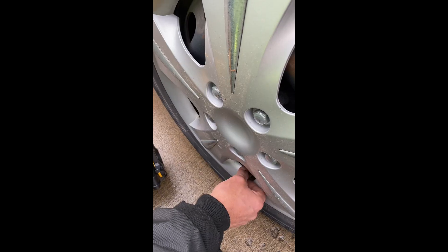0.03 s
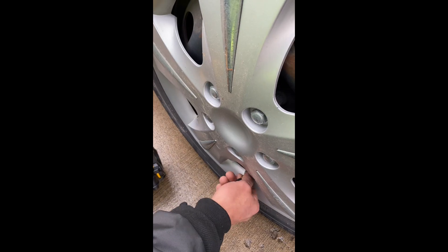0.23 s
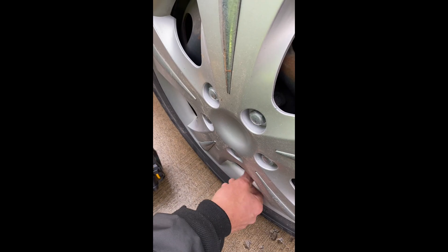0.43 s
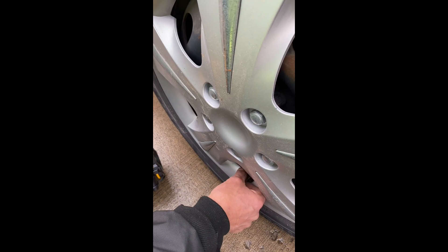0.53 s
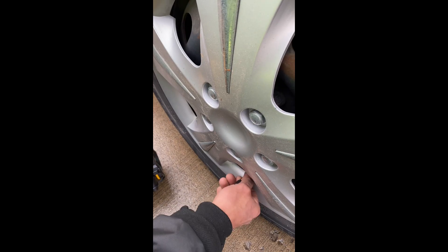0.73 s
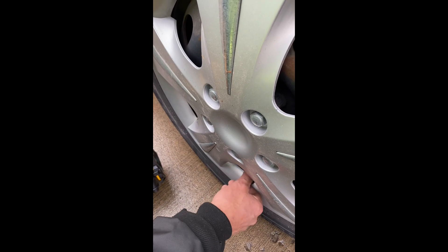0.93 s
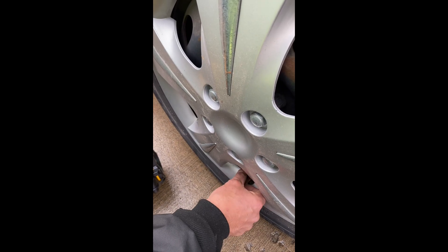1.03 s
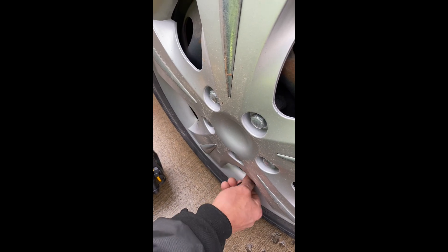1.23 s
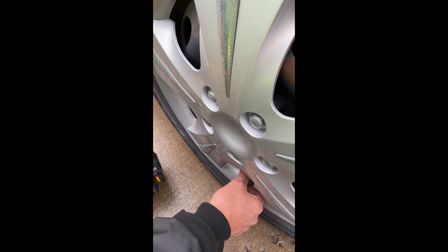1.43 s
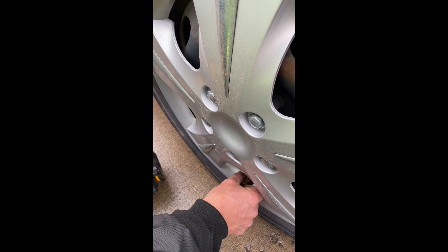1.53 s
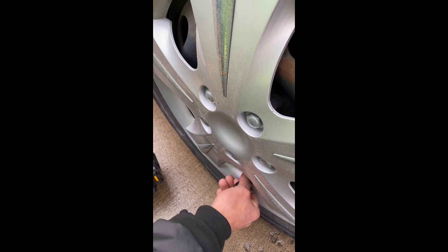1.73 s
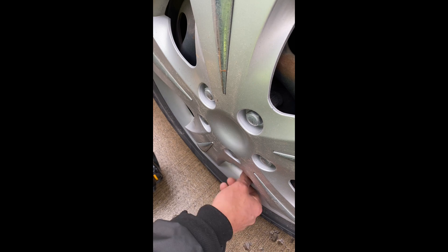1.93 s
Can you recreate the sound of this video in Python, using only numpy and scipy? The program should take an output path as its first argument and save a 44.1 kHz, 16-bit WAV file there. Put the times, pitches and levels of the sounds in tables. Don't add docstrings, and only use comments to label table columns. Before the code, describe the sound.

Close stereo pickup of a high, breathy air leak at a car wheel, growing after a quiet start, pulsing slightly, then stopping abruptly, with soft cloth brushing, tiny breeze pops and low far-off traffic.

```python
import sys
import numpy as np
from scipy import signal
from scipy.fft import rfft, irfft
from scipy.io import wavfile

SR = 44100
rng = np.random.default_rng(int(sys.argv[2]) if len(sys.argv) > 2 else 0)


def to_linear_factor(level_db):
    exponent = np.asarray(level_db, float) / 20
    return 10 ** exponent


def unload_wav(signal):
    wavfile.write(
        sys.argv[1],
        SR,
        np.round(np.clip(np.atleast_2d(signal).T, -1, 1) * 32767).astype(np.int16),
    )


N = 88200


def rms_one(x):
    return x / np.sqrt(np.mean(x ** 2) + 1e-20)


def at_hz(points, hz):
    table = np.array(points)
    return np.interp(np.log(hz), np.log(table[:, 0]), table[:, 1])


def drift(rate):
    r = np.exp(-80 * np.pi * rate / SR)
    slow = signal.lfilter([1], [1, -2 * r, r * r], rng.standard_normal(N // 40 + 1002))[1000:]
    return np.interp(np.arange(N) / 40, np.arange(len(slow)), rms_one(slow))


def banded(spectrum, patchy_db, slow_db):
    lowest, highest = spectrum[0][0], spectrum[-1][0]
    edges = np.geomspace(lowest, highest, int(3 * np.log2(highest / lowest)) + 2)
    white = rng.standard_normal((2, 2, N + 4000))
    together = drift(8)
    out = 0
    for k, (low, high) in enumerate(zip(edges, edges[1:])):
        sos = signal.butter(2, [low, high], "band", fs=SR, output="sos")
        band = signal.sosfilt(sos, white[k % 2])[:, 4000:]
        flicker_db = slow_db * drift(2.5) + patchy_db * (together + drift(50))
        out = out + band * to_linear_factor(at_hz(spectrum, np.sqrt(low * high)) + flicker_db)
    return rms_one(out)


def narrow(hz, width_hz):
    sos = signal.butter(2, width_hz / 2, fs=SR, output="sos")
    slow = signal.sosfilt(sos, rng.standard_normal((2, 2, N + 9000)))[..., 9000:]
    turn = 2 * np.pi * np.cumsum(np.broadcast_to(hz, N)) / SR
    return rms_one(slow[0] * np.cos(turn) + slow[1] * np.sin(turn))


# [t/s, level/dB, hollow's ringing f/Hz, dull share level/dB, gap tone level/dB, top fizz level/dB]
LEAK = [(0, -104, 9500, 2, -27, -10), (0.201, -83, 9500, -10, -13, -11),
        (0.328, -55.5, 9490, 1, -16.5, -12), (0.468, -56.5, 9250, 6, -14, -3),
        (0.623, -46.5, 8784, -4.5, -24, -19), (.73, -40.5, 9390, 5, -13, -6.5),
        (0.829, -34, 10000, 3.5, -15.5, -2.5), (.97, -41.5, 9590, 1.5, -11.5, 2),
        (1.03, -36.5, 8670, 2, -42, -5), (1.11, -36, 8484, 1, -44, -4), (1.2, -32.5, 8880, -0.5, -22, -5),
        (1.299, -36.5, 9010, 3.5, -9, 1), (1.378, -34.5, 9030, 0, -17.5, -1.5),
        (1.481, -41, 8590, 2, -27, 2), (1.54, -35, 8384, -2, -37, 3), (1.68, -33, 8400, -3, -41, -8),
        (1.736, -58, 8600, 11.5, -20, -3), (1.8, -65.5, 9000, 11.5, -22, 3)]
# [f/Hz, level/dB per Hz]
HISS_SPECTRUM = [(5300, -17.5), (6200, -14.5), (7500, 10), (8500, 1.5), (10000, 0), (12000, 3),
                 (13500, -11.5)]
DULL_SPECTRUM = [(300, -13.5), (1000, -13), (2200, -11), (3500, -7.5), (5000, -1.5), (6500, -3),
                 (8000, 6.5)]
FIZZ_SPECTRUM = [(12000, -9), (13500, 4), (15000, -1), (16500, 0)]
# [f/Hz, width f/Hz, level/dB]
WHISTLES = [
    (3295, 260, -28.5),
    (2244, 380, -29),
    (12700, 710, -12),
]


def jet():
    t, *columns = np.transpose(LEAK)
    level_db, hollow_hz, dull_db, tone_db, fizz_db = [np.interp(np.arange(N) / SR, t, c) for c in columns]
    out = banded(HISS_SPECTRUM, patchy_db=0.73, slow_db=0.5)
    out = out + to_linear_factor(-9.5 + dull_db) * banded(DULL_SPECTRUM, patchy_db=0.15, slow_db=0.5)
    out = out + to_linear_factor(-6.5 + 2.5 * drift(7.5)) * narrow(hollow_hz, width_hz=1300)
    out = out + to_linear_factor(tone_db) * narrow(5273, width_hz=780)
    out = out + to_linear_factor(fizz_db) * banded(FIZZ_SPECTRUM, patchy_db=1.0, slow_db=0.5)
    for hz, width_hz, db in WHISTLES:
        whistle = narrow(hz * (1 + .012 * drift(3)), width_hz)
        out = out + to_linear_factor(db + dull_db + 2 * drift(3.1)) * whistle
    return to_linear_factor(level_db) * out


# [delay t/s, level/dB]
RIM_ECHOES = [
    (.0013, -44.5),
    (.0031, -18.5),
    (.0057, -19),
    (.0092, -15),
]


def with_echoes(hiss):
    return hiss + sum(to_linear_factor(db) * np.roll(hiss, int(delay * SR), axis=1) for delay, db in RIM_ECHOES)


# [t/s, length t/s, brush level/dB, cloth body level/dB]
RUSTLES = [
    (0.192, 0.14, -57.5, -70),
    (.4, 0.131, -73, -67),
    (0.705, 0.089, -63, -61),
    (0.909, 0.097, -53, -70),
    (1.209, 0.077, -67, -59.5),
    (1.7, 0.121, -57, -61.5),
    (1.814, 0.091, -81, -70.5),
    (1.893, 0.1104, -57.5, -63),
]
# [f/Hz, level/dB per Hz]
BRUSH_SPECTRUM = [(200, -9.5), (500, 0), (1100, 2.5), (2300, 1.5), (4500, -3), (9000, 0), (16500, -17)]


def rustle():
    t = np.arange(N) / SR
    edge = 0.076
    shapes = []
    for start, length, _, _ in RUSTLES:
        inside = .5 - np.abs((t - start) / length - .5)
        shapes.append(np.clip(inside / edge, 0, 1))
    brush, body = to_linear_factor(np.array(RUSTLES)[:, 2:].T) @ shapes
    out = brush * banded(BRUSH_SPECTRUM, patchy_db=-1.0, slow_db=-2.5)
    return out + body * narrow(1200, width_hz=1050)


# [t/s, peak level/dB]
POPS = [(.022, -53), (.1, -54), (.282, -54), (.344, -54), (.401, -54), (.429, -54), (.501, -56),
        (.510, -55), (.65, -54), (.77, -53), (.869, -50), (1.159, -59), (1.173, -50)]


def pops():
    start_hz, slows_s, rise_s, fade_s = 900, .0022, .0012, .007
    out = np.zeros(N)
    for start, db in POPS:
        t = np.clip(np.arange(N) / SR - start, 0, None)
        swell = (1 - np.exp(-t / rise_s)) * np.exp(-t / fade_s)
        out += to_linear_factor(db + 4.5) * swell * np.sin(2 * np.pi * start_hz * slows_s * np.log1p(t / slows_s))
    return out


# [f/Hz, level/dB per Hz]
RUMBLE_SPECTRUM = [(13, 2), (22, 5.5), (38, -5.5), (81, 0.5), (117, -5.5), (146, -5.5), (210, -18.5),
                   (400, -34), (520, -22.5), (880, -120)]
# [f/Hz, width f/Hz, level/dB]
ENGINE_HUM = [
    (48, 41, -55),
    (76.5, 11.3, -54.5),
]


def traffic():
    hum = sum(to_linear_factor(db) * narrow(hz, width_hz) for hz, width_hz, db in ENGINE_HUM)
    return hum + to_linear_factor(-51) * banded(RUMBLE_SPECTRUM, patchy_db=0.5, slow_db=-1.5)


# [f/Hz, level/dB per Hz]
AIR_SPECTRUM = [(250, 2.5), (600, -2), (1200, -6), (2800, -9.5), (5000, -10.5), (10000, -12.5), (16000, -6)]


def open_air():
    return to_linear_factor(-59.5) * banded(AIR_SPECTRUM, patchy_db=3.5, slow_db=0.6)


# [f/Hz, phase/radians]
PORT_PHASE = [(5500, .45), (6200, 1.9), (6800, 2.9), (7700, 3.35), (9000, 4.8), (9900, 6.15), (11000, 6.4),
              (12200, 8.3), (12900, 9.2), (14250, 9.7), (15300, 11.5), (15800, 12.2)]
# [f/Hz, level/dB]
PORT_BALANCE = [(60, 0), (180, -.2), (550, 2.6), (1300, 2.0), (2400, 0), (15000, 0)]
# [f/Hz, level/dB]
UNLIKE = [(40, -48), (120, -24), (300, -8), (700, -1), (1600, -5), (5000, -3), (6400, -21), (16000, -21)]
# [f/Hz, level/dB]
JET_ALIKE = [(1000, 0), (1700, -8), (2400, -1), (3300, -5), (4300, -2), (5200, -4), (6500, 0), (16000, 0)]
# [f/Hz, half width f/Hz, depth/radians]
WAVER = [(2550, 350, .7), (4300, 550, .55), (6250, 500, .33), (8850, 750, .33), (11850, 600, .35),
         (15100, 600, .38)]


def ports(pair, near):
    shared, other = rfft(pair)
    hz = np.maximum(np.arange(len(shared)) * SR / N, 1)
    unlike_db = at_hz(UNLIKE, hz)
    if near:
        unlike_db = unlike_db + at_hz(JET_ALIKE, hz)
    unlike = to_linear_factor(unlike_db)
    bass_fade = hz ** 2 / (hz ** 2 + 400 ** 2)
    turn = np.exp(.5j * at_hz(PORT_PHASE, hz) * bass_fade)
    lean = turn * to_linear_factor(at_hz(PORT_BALANCE, hz) / 2)
    shapes = [depth * np.exp(-((hz - centre) / width) ** 2) for centre, width, depth in WAVER]
    apart = other * unlike + sum(1j * shape * rfft(pair[0] * drift(12)) for shape in shapes)
    both = np.array([(shared + apart) * lean, (shared - apart) / lean])
    return irfft(both / np.sqrt(1 + unlike ** 2 + sum(shapes) ** 2), N)


def scene():
    hiss = ports(with_echoes(jet()), near=True)
    around = ports(rustle() + traffic() + open_air(), near=False)
    return hiss + around + pops() * [[1], [-1]]


# [t/s, half width t/s, depth level/dB]
DUCKS = [
    (.02, 0.013, 9),
    (0.083, 0.046, 18),
    (.165, 0.023, 0),
    (1.86, 0.035, 10.5),
]


def suppress_noise(x):
    t = np.arange(N) / SR
    duck = to_linear_factor(-sum(db * np.exp(-((t - centre) / width) ** 2) for centre, width, db in DUCKS))
    low = signal.sosfiltfilt(signal.butter(4, 1750, fs=SR, output="sos"), x)
    return low + duck * (x - low)


def low_pass(x):
    return signal.sosfilt(signal.butter(12, 15850, fs=SR, output="sos"), x)


def record(dry):
    dry = signal.sosfilt(signal.butter(5, 36, "high", fs=SR, output="sos"), dry)
    hz = np.arange(N // 2 + 1) * SR / N
    dry = irfft(rfft(dry) * (hz < 15740), N)
    mix = suppress_noise(dry)
    return low_pass(mix)


dry = scene()
out = record(dry)
unload_wav(out)
```